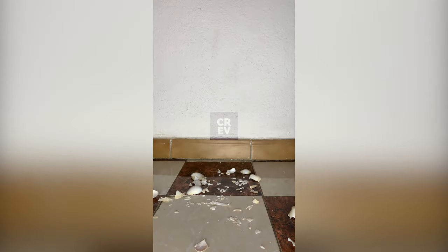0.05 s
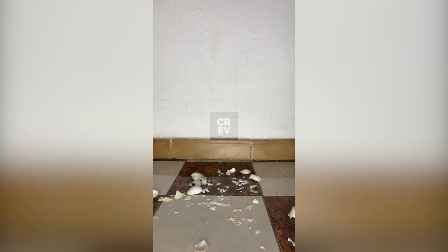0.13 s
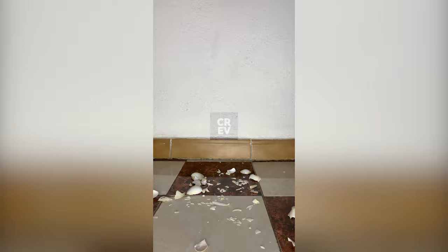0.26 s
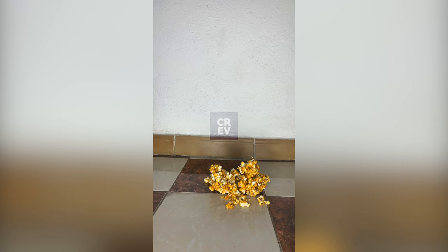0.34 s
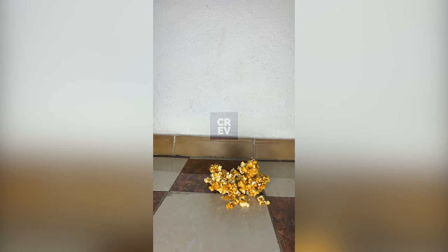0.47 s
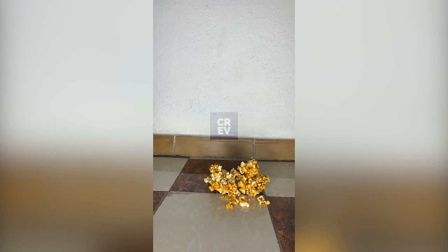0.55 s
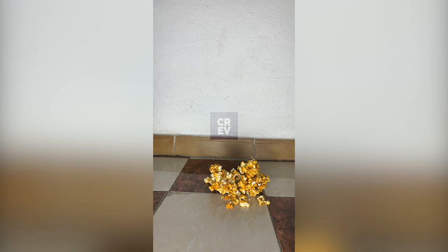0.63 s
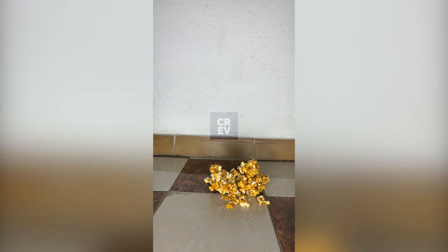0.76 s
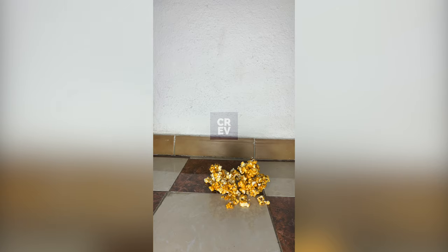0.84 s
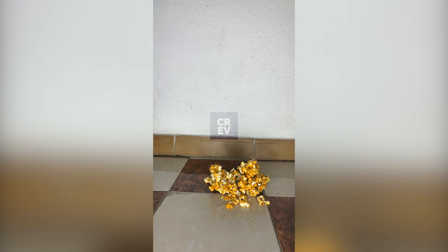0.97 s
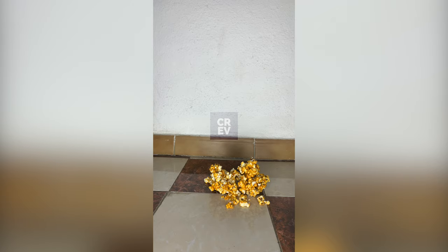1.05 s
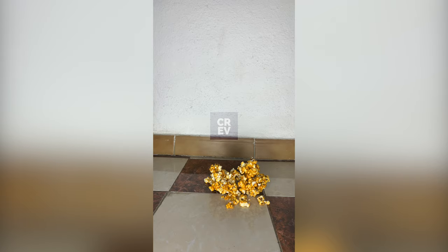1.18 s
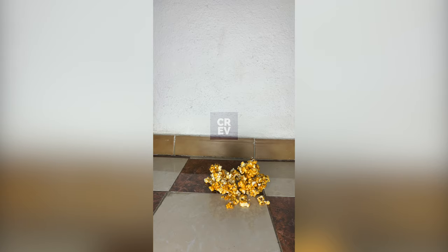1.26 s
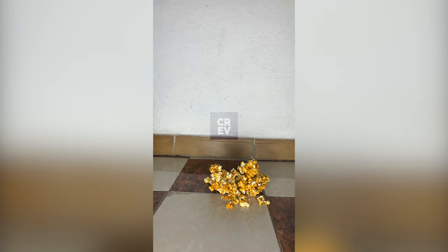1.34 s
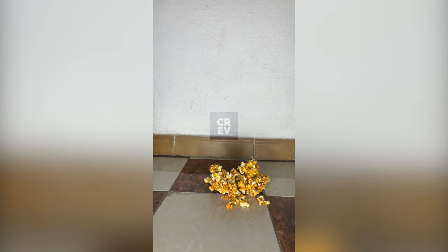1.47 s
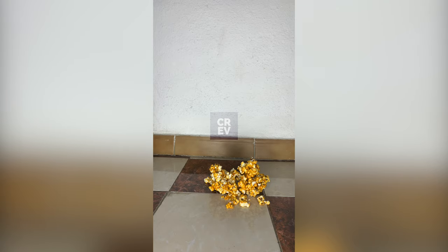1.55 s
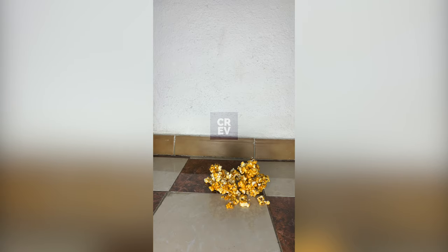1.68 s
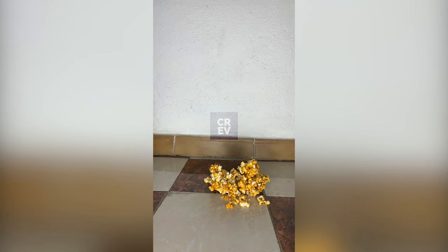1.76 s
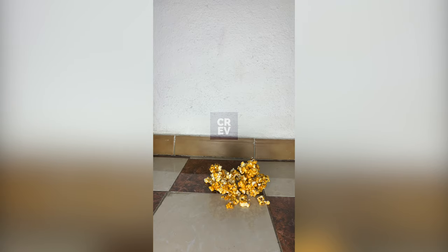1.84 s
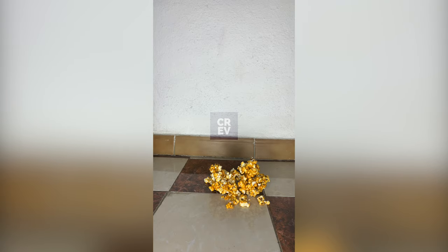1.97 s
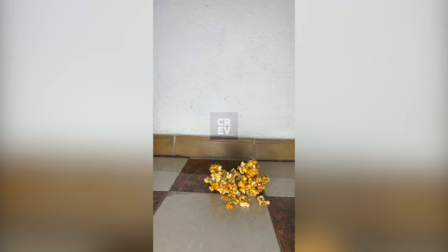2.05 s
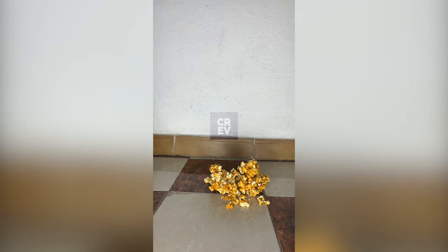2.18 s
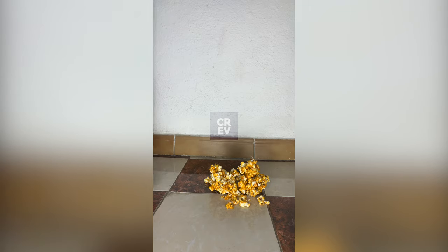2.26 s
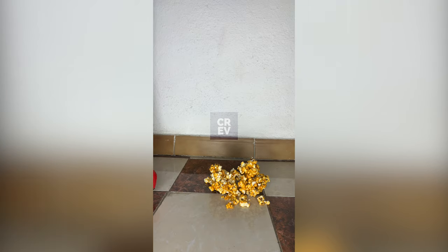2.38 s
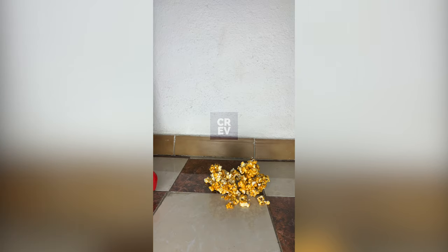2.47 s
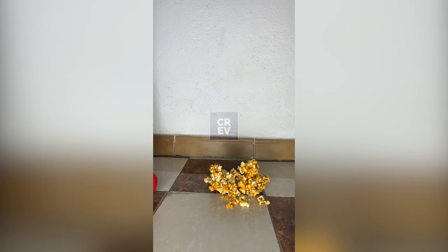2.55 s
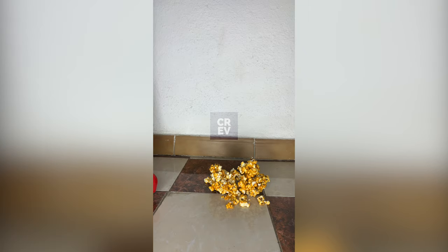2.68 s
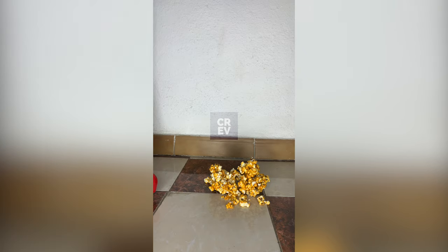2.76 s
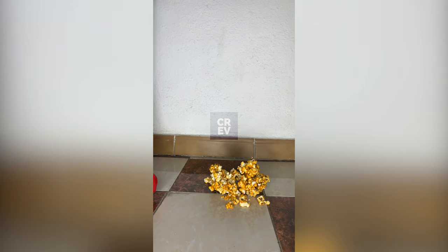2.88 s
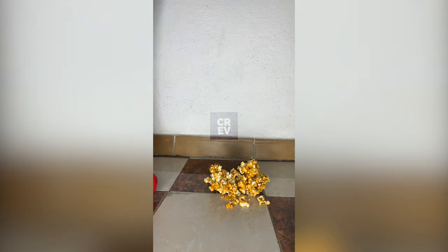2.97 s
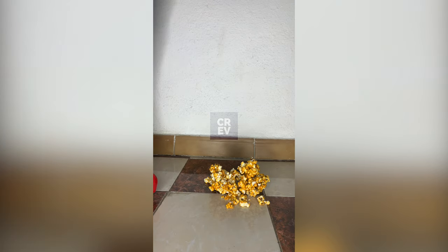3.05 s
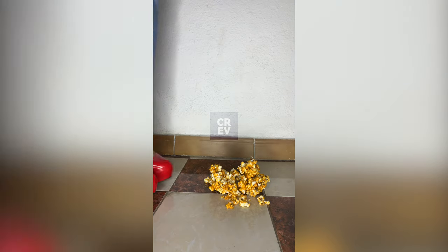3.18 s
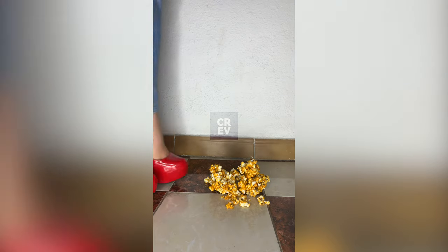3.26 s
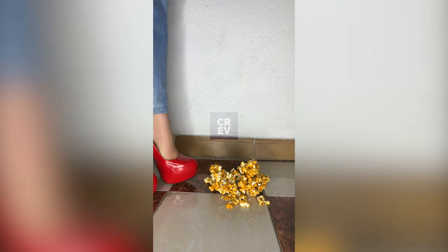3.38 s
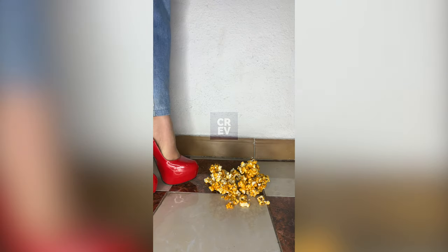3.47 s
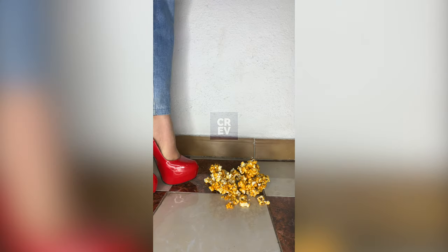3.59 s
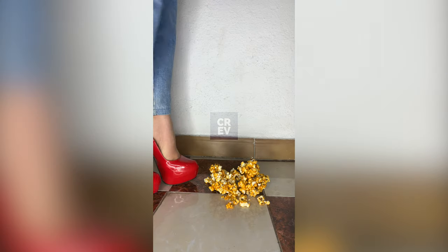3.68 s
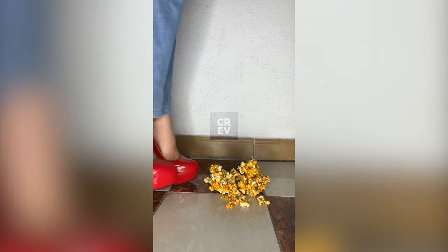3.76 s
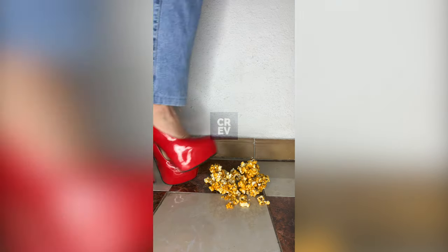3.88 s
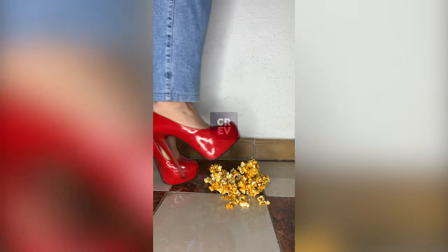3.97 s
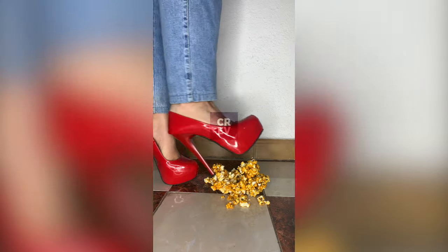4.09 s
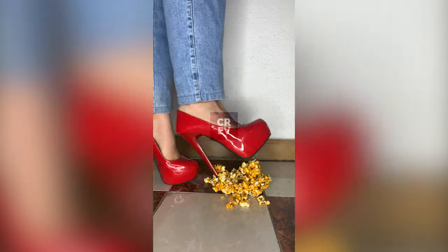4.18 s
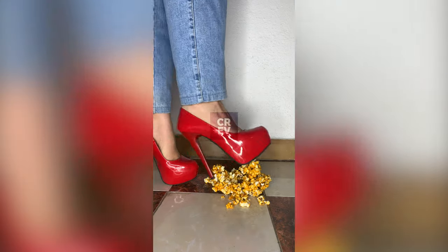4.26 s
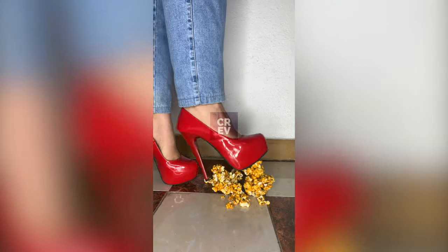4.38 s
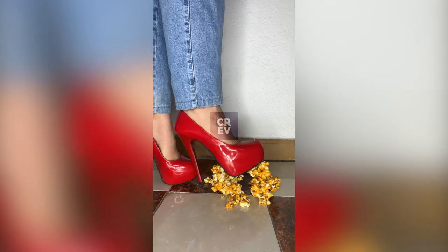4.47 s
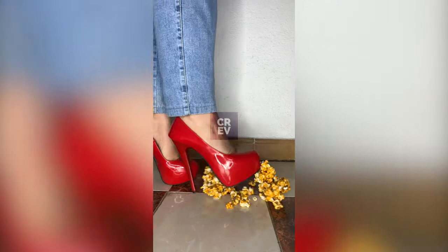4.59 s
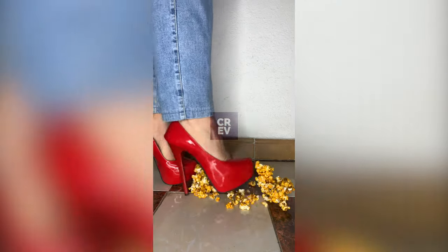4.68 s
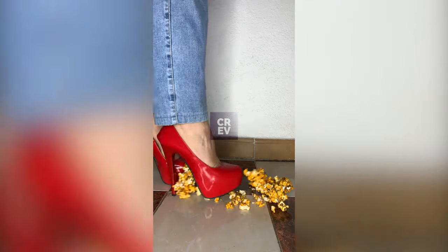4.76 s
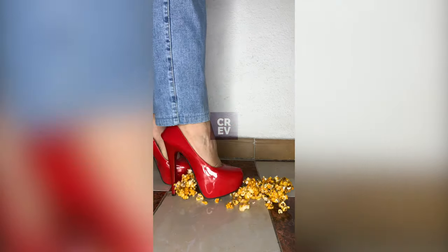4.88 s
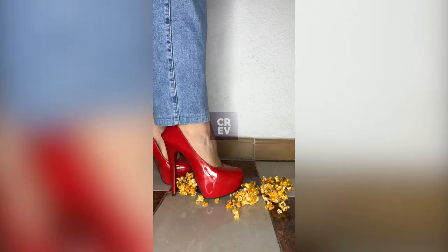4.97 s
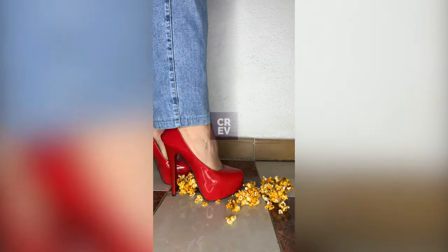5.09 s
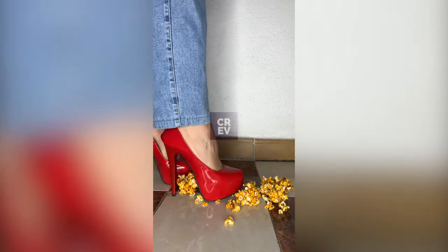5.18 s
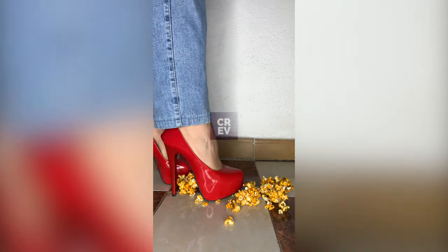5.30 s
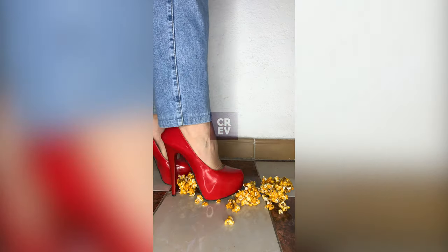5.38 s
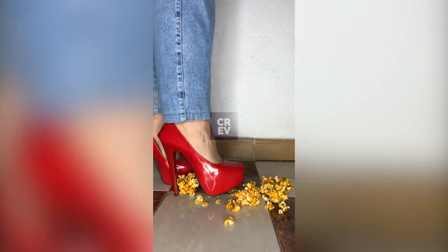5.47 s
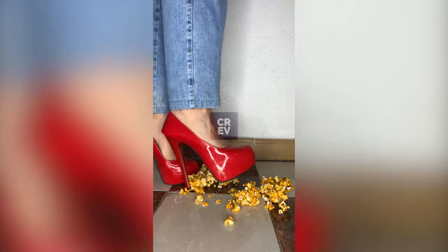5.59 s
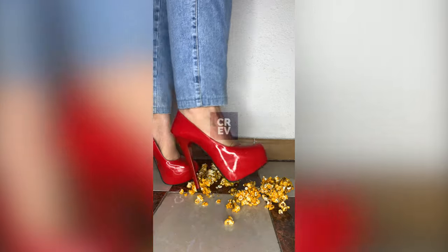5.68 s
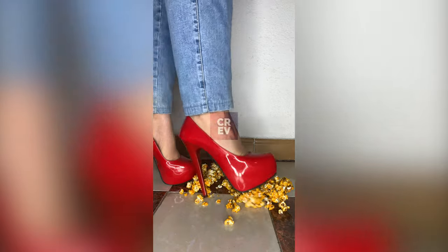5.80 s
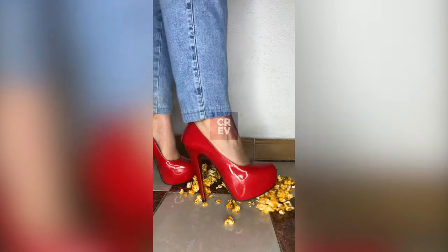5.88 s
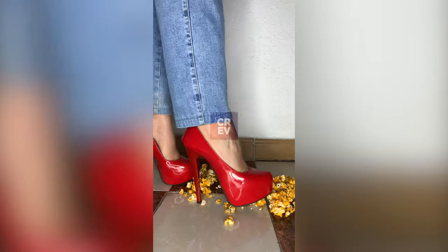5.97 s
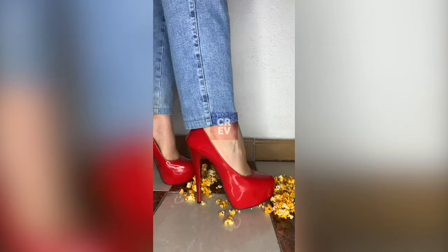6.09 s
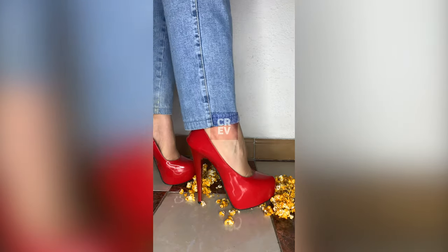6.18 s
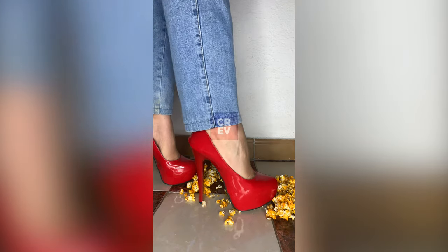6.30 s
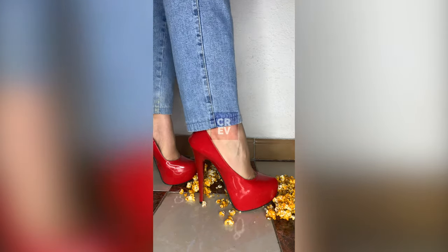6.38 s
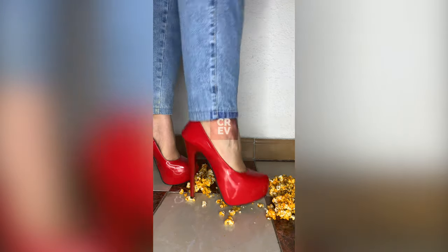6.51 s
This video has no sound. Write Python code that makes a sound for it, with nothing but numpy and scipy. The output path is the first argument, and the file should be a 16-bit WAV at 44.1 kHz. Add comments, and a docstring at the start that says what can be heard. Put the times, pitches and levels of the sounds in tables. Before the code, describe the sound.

Hard platform heels knock across a tiled floor, then tread twice on a heap of caramel popcorn with bright, brittle crunches in a small room.

```python
"""Platform heels walk up over a tiled floor and tread twice on a heap of caramel popcorn, close to a phone.
Each low knock is a falling chirp through the floor slab plus dull noise ringing the hollow platform.
Grit ticks, then sugar shells snap: short noise bursts, sharp clicks and streams of tiny ringing fractures.
Jeans and soles brush softly in between, as uneven swells of grainy noise.
A small hard room adds echoes and boom, over faint rumble and hiss."""
import sys
import numpy as np
from scipy import signal
from scipy.fft import rfft, irfft
from scipy.io import wavfile

SR = 44100
rng = np.random.default_rng(int(sys.argv[2]) if len(sys.argv) > 2 else 0)


def master(y):
    """Save y as 16-bit WAV."""
    cut = np.clip(np.atleast_2d(y).T, -1, 1)
    pcm = np.round(cut * 32767)  # scale
    wavfile.write(sys.argv[1], SR, pcm.astype(np.int16))


N = 288414
HZ = np.fft.rfftfreq(N, 1 / SR)
T = np.arange(N) / SR

# background air, colour of its low and high part: pitch_hz, level_db
AIR_RUMBLE = [(20, -9), (70, 3.5), (130, -6.5), (500, -24), (1500, -26), (15000, -36)]
AIR_HISS = [(100, -13.5), (5000, 2), (8000, -0.5), (13500, -2.5), (15500, -37)]
HUSH_END_S = 0.437  # the air is quieter until here

# low knocks through the floor: heel taps, a slab echo and a faint low bump:
# start_s, level_db, cutoff_hz (harder = higher), bass_db, clack_db
LOW_KNOCKS = [(.225, -56, 400, -4, -16), (1.544, -22, 634, -18, -9), (1.577, -28.5, 405, -14, -21),
              (1.955, -51, 700, -21, -33), (2.497, -31.5, 800, -1, -17), (3.4275, -24, 600, -15, -14.5),
              (4.168, -39.5, 312, -1, -35), (4.808, -15, 360, -11, -34), (5.256, -22.5, 1020, -6, -31),
              (5.835, -36.5, 245, 3, -40)]
# platforms slapping down after the heel or rocking back:
# start_s, level_db, cutoff_hz, bass_db, clack_db
PLATFORM_SLAPS = [(1.624, -22, 517, 11, -3.5), (2.575, -32.5, 900, 4.5, -16),
                  (2.644, -35.5, 700, 12.5, -3.5), (3.478, -21, 710, 0.5, -4), (3.519, -35.5, 706, -29, -4),
                  (3.623, -32.5, 1100, -26, 7), (4.230, -38.5, 900, -31, 5), (5.976, -15, 1100, 4.5, -5),
                  (6.110, -18.5, 900, 14.5, 3.5), (6.285, -10, 1290, -0.5, -0.5),
                  (6.339, -15, 2110, -15, 6.5)]
# colour of the floor slab: pitch_hz, level_db
SLAB_COLOUR = [(30, -64), (60, -9), (100, 1.5), (160, 9), (280, 4), (400, 2), (560, -0.5), (700, -6.5),
               (1070, 0.5), (1280, -11.5), (3000, -15), (8000, -54)]
# resonances of the platform sole pressing on the tile: pitch_hz, width_hz, level_db
SOLE_MODES = [(467, 277, 7), (605, 54, 3.5), (964, 216, 6.5), (1493, 200, 7.5), (1890, 200, -3),
              (3180, 2300, 4.5)]
# the low knocks ring the slab, a flat platform damps it
KNOCK_RING_DB, PLATFORM_RING_DB = 2.5, -41
# travel time of a 1 kHz bending wave, before a fifth of it is taken off every pitch's delay
KNOCK_TRAVEL_MS, PLATFORM_TRAVEL_MS = 5.33, 4.7

# cloth and soles brushing, one swell for each move of a leg: middle_s, length_s, level_db, treble_db
LEG_BRUSHES = [(0.925, 0.28, -61.5, -28), (1.097, 0.045, -55.5, -40), (1.293, 0.094, -57.5, -12),
               (1.898, 0.31, -59.5, -6.5), (2.076, 0.32, -46, -11), (2.898, 0.083, -62, -46),
               (2.979, 0.062, -54, -29), (3.188, 0.033, -49, 0.5), (3.89, 0.25, -47.5, -13),
               (5.492, 0.45, -51.5, -10.5), (5.67, 0.24, -40, -15.5)]
# colour of the cloth: pitch_hz, level_db
CLOTH_COLOUR = [(60, -2.5), (220, 1), (650, -5), (1300, 1.5), (3200, -6.5), (4800, 1.5), (13000, -3.5),
                (16000, -6)]
CATCH_DB = 5  # how unevenly brushing fibres catch

# short bursts of crackle: grit ticking under the soles, then shells snapping:
# start_s, level_db, fade_ms, ring_pitch_hz
CRACKLE_BURSTS = [(1.098, -55.5, 11, 11400), (4.1455, -17.5, 4.35, 6760), (4.358, -26, 8.7, 7300),
                  (4.549, -4.5, 1.03, 7400), (4.5915, -4.5, 0.97, 7400), (4.6766, -18.5, 5, 7200),
                  (4.777, -25, 7.9, 8000), (4.9356, -6.5, 2.58, 3450), (5.096, -3.5, 1.1, 3290),
                  (5.594, -38, 19, 7000), (5.8368, -18, 1.6, 7600), (5.905, -25, 8.4, 7400),
                  (5.99, -19.5, 5.1, 12000), (6.033, -17, 9, 7540), (6.041, -9.5, 7.6, 11300),
                  (6.117, -4.5, 2.4, 12330), (6.242, -13, 2.2, 11600), (6.285, -4, 2.8, 3180),
                  (6.3423, -11.5, 2.5, 7800), (6.364, -12.5, 2.3, 3300)]
# colour of the crackle, clicks and snapping shells: pitch_hz, level_db
CRACKLE_COLOUR = [(150, -8), (500, -19), (1000, -9), (2300, -9.5), (3400, -4), (4600, 1), (6000, 2.5),
                  (8000, 4), (10500, 2), (12500, 5.5), (15700, -1.5)]
# lone sharp clicks: a hard shoe tap, then snapping sugar: start_s, level_db
SHARP_CLICKS = [(3.625, -36.5), (4.164, -23), (4.3915, -21), (4.406, -18), (4.415, -23), (4.5203, -31.5),
                (4.552, -17.5), (4.567, -23), (4.608, -14), (4.8113, -19), (4.821, -26), (4.926, -27.5),
                (4.989, -27.5), (5.043, -19.5), (5.052, -17), (5.067, -21), (5.0827, -22.5), (5.136, -21.5),
                (5.147, -27), (5.453, -42), (5.661, -32.5), (5.956, -27), (6.081, -22), (6.1075, -12),
                (6.133, -18), (6.198, -22.5), (6.2332, -30), (6.3345, -21)]
# how packed the heap is; packed crumbs sound lower: time_s, grinding_against_snapping_db
HEAP_PACKING = [(4.35, -13.5), (4.6, -16), (4.75, -8.5), (5.1, -10.5), (6.23, -10.5), (6.29, 0)]
# how fast the heap gives way under each press of the foot: time_s, fracture_level_db
TOUCH_PRESS = [(4.35, -37), (4.362, -26.5), (4.38, -44.5), (4.393, -33.5), (4.42, -32.5), (4.455, -38),
               (4.49, -55)]
FIRST_PRESS = [(4.515, -35.5), (4.565, -20.5), (4.62, -22.5), (4.686, -30.5), (4.705, -37.5), (4.78, -36),
               (4.817, -23), (4.90, -41.5), (5.029, -47), (5.06, -26.5), (5.139, -35.5), (5.19, -84)]
SECOND_PRESS = [(5.837, -38.5), (5.861, -32.5), (5.896, -43.5), (5.919, -27.5), (5.968, -44), (5.998, -32),
                (6.117, -24.5), (6.16, -46.5), (6.229, -57)]
STAMP_PRESS = [(6.278, -52), (6.285, -15.5), (6.311, -54.5), (6.352, -39), (6.41, -70), (6.53, -56)]
CLUMP_DB = 3.1  # how far the heap's fractures bunch together

# how long the room's echoes take to drop by 60 dB: pitch_hz, decay_s
ECHO_DECAY = [(100, 1.35), (250, 0.6), (600, 0.27), (1500, 0.42), (4000, 0.32), (8000, 0.28), (15000, 0.05)]
# strength of the echoes: pitch_hz, level_db
ECHO_LEVEL = [(60, 2), (130, -7), (260, -2.5), (600, -6), (8000, -7.5), (15000, -3)]
# standing waves of the room: pitch_hz, level_db, decay_s (a drop of 60 dB)
STANDING_WAVES = [(94.5, -54, 0.63), (122.96, -48, 0.36), (206.4, -52, 0.14), (249.1, -52, 0.22)]
# echo that the two microphone ports do not share: pitch_hz, level_db
UNSHARED_ECHO = [(80, -17.5), (300, -1.5), (1000, 3), (3500, 3.5), (7000, -4), (9800, -34), (12500, -8.5)]
# how far the left port leads the right: pitch_hz, lead_radians
PORT_LEAD = [(0, 0), (400, -.2), (1150, -.7), (1700, .1), (2400, 1.5), (3100, .8), (4400, 2), (5400, 4.3),
             (6500, 6), (7400, 6.5), (9750, 9.42), (11800, 12.3), (12700, 12.8), (15000, 15.7), (16000, 16)]
# how much louder the left port is than the right: pitch_hz, difference_db
PORT_LEVEL = [(60, -0.77), (150, 2.3), (600, 0.029), (1500, -1.7), (7000, 0)]
TOP_HZ = 15750  # the phone cuts everything above


def undb(db):
    """Decibels to gain."""
    return 10 ** (np.asarray(db) / 20)


def along(points, hz):
    """Read (pitch, value) points, evenly spaced by octave rather than by hertz."""
    pitch, value = np.transpose(points)
    return np.interp(np.log(hz + 1), np.log(pitch), value)


def colour(x, points):
    """Filter that never sounds ahead of its input and keeps the power of white noise."""
    gain = undb(along(points, HZ))
    level_gain = gain / np.sqrt(np.mean(gain ** 2))
    # folding the cepstrum forward in time keeps the filter from ringing early
    cepstrum = irfft(np.log(level_gain), N)
    cepstrum[1:N // 2] *= 2
    cepstrum[N // 2 + 1:] = 0
    return irfft(rfft(x) * np.exp(rfft(cepstrum)), N)


def add(track, s, x):
    """Mix x into the track from time s on."""
    i = int(s * SR)
    track[i:i + len(x)] += x[:N - i]


def resonance(hz, centre, width):
    """Response of one ringing mode, 1 at its centre."""
    return 1j * hz * width / (centre ** 2 - hz ** 2 + 1j * hz * width)


def waver(per_s):
    """Random values joined by straight lines, so many a second."""
    return np.interp(T * per_s, np.arange(N), rng.standard_normal(N))


def air(rumble_db=-70, hiss_db=-76, rumble_hush_db=-7, hiss_hush_db=-18, side_db=-13):
    """Faint rumble and hiss of coloured noise, both quieter for the first moment."""
    hush = T < HUSH_END_S
    rumble = colour(rng.standard_normal((2, N)), AIR_RUMBLE) * undb(rumble_db + rumble_hush_db * hush)
    hiss = colour(rng.standard_normal((2, N)), AIR_HISS) * undb(hiss_db + hiss_hush_db * hush)
    mid, side = (rumble + hiss) * undb([[0], [side_db]])
    return np.array([mid + side, mid - side])


def floor_knocks(knocks, ring_db, travel_ms, bass_hz=170, gain_db=0, ring_hz=207, ring_width_hz=42,
                 ring_spread=0.11, scatter_db=-29, scatter_ms=7):
    """High bending waves cross the slab faster than low ones, so each knock arrives as a falling chirp."""
    out, size = np.zeros(N), 16384
    hz, ms = np.fft.rfftfreq(size, 1 / SR), np.arange(size) * 1000 / SR
    khz = hz / 1000
    # the fastest waves arrive at the knock's time
    travel = np.exp(-2j * np.pi * travel_ms * (2 * np.sqrt(khz) - .2 * khz))
    for s, db, cutoff_hz, weight_db, _ in knocks:
        softness = 1 / np.sqrt(1 + (hz / cutoff_hz) ** 7)
        bass_db = weight_db / (1 + (hz / bass_hz) ** 2)
        wave = travel * softness * undb(along(SLAB_COLOUR, hz) + bass_db)
        # every knock rings at its own pitch and gets its own reflections from the edges
        spot_hz = ring_hz * (1 + ring_spread * rng.uniform(-1.1, 1))
        ring = undb(ring_db) * resonance(hz, spot_hz, ring_width_hz)
        fade = np.exp(-ms / scatter_ms)
        scatter = rfft(rng.standard_normal(size) * fade * (1 - fade)) * undb(scatter_db)
        knock = irfft(wave * (1 + ring + scatter))[:size // 2]
        plain_peak = np.abs(irfft(wave)).max()
        add(out, s, knock / plain_peak * undb(db + gain_db))
    return out


def sole(x):
    """Breaks and knocks under the platform ring it like a hollow block."""
    response = sum(undb(db) * resonance(HZ, hz, width) for hz, width, db in SOLE_MODES)
    return irfft(rfft(x) * response, N)


def clacks(knocks, gain_db=-3, fade_s=0.0033, lag_s=0.001957, soft_hz=1500, scrape_db=-19,
           scrape_s=0.0097):
    """Each knock comes with dull noise ringing the hollow platform, and a weaker scrape that fades slower."""
    out, t = np.zeros(N), T[:4096]
    shape = np.exp(-t / fade_s) + undb(scrape_db) * np.exp(-t / scrape_s)
    for s, db, *_, clack_db in knocks:
        add(out, s + lag_s, rng.standard_normal(len(t)) * shape * undb(db + gain_db + clack_db))
    ratio = HZ / soft_hz
    dull = irfft(rfft(out) / (1 + 1j * ratio - ratio ** 2), N)
    return sole(dull)


def fractures(per_s, spread_db, ring_ms, top_hz, kernel_share=0, kernels_per_s=90):
    """A stream of tiny ringing breaks, many weak and a few strong, brought to an rms of 1."""
    when, pitch, size, turn, member = rng.random((int(per_s * N / SR), 5)).T
    # a share of the breaks rings near the pitch of the kernel that gives way
    kernel = rng.random(N)[(when * T[-1] * kernels_per_s).astype(int)]
    pitch = np.where(member < kernel_share, .9 * kernel + .1 * pitch, pitch)
    size = undb(spread_db * np.minimum(-np.log(1 - size), 4))
    k = np.arange(96)  # samples in one break
    fade = np.exp(-k * 1000 / (ring_ms * SR))
    ring = np.cos(2 * np.pi * (turn[:, None] + pitch[:, None] * top_hz * k / SR))
    grains = size[:, None] * fade * ring
    places = (when * N).astype(int)[:, None] + k
    out = np.bincount(places.ravel(), grains.ravel(), N)[:N]
    return out / out.std()


def brushes(split_hz=3000, gain_db=-2, catches_per_s=45):
    """Fibres and grit catch and slip in soft, uneven swells."""
    grit = colour(fractures(per_s=7000, spread_db=0.5, ring_ms=0.088, top_hz=15700), CLOTH_COLOUR)
    low = irfft(rfft(grit) / (1 + (HZ / split_hz) ** 2), N)
    # the treble wavers half as far as the rest
    high = (grit - low) * undb(CATCH_DB / 2 * waver(catches_per_s))
    low = low * undb(CATCH_DB * waver(catches_per_s))
    out = np.zeros(N)
    for s, length, db, treble_db in LEG_BRUSHES:
        on = np.abs(T - s) < length / 2
        swell = np.cos(np.pi * (T[on] - s) / length) * undb(db + gain_db)
        out[on] += swell * (low[on] + undb(treble_db) * high[on])
    return out


def packing(s):
    """How packed the heap is at time s, in dB of grinding against snapping; held level outside the table."""
    return np.interp(s, *np.transpose(HEAP_PACKING))


def crackle(gain_db=-2, hollow_db=2, ring_db=4, ring_width=0.35, swell_db=-22, swell_ms=4.8,
            rise_ms=0.17):
    """Each crack is a short ringing noise burst with a faint swell into it, plus a part for the hollow sole."""
    bright, hollow = np.zeros(N), np.zeros(N)
    ms, hz, lead_ms = np.arange(4096) * 1000 / SR, np.fft.rfftfreq(4096, 1 / SR), 12
    age = np.abs(ms - lead_ms)
    swell = undb(swell_db) * np.exp(-age / swell_ms)
    for s, db, fade_ms, ring_hz in CRACKLE_BURSTS:
        crack = np.exp(-age / fade_ms) * (1 - np.exp(-age / rise_ms))
        shape = np.where(ms < lead_ms, swell, crack)
        burst = rng.standard_normal((2, len(ms))) * shape * undb(db + gain_db)
        ring = 1 + undb(ring_db) * resonance(hz, ring_hz, ring_width * ring_hz)
        start = s - lead_ms / 1000
        add(bright, start, irfft(rfft(burst[0]) * ring) / np.sqrt(np.mean(np.abs(ring) ** 2)))
        add(hollow, start, burst[1] * undb(packing(s) + hollow_db))
    return np.array([bright, hollow])


def sharp_clicks(gain_db=0, fade_ms=0.36, hollow_db=-3):
    """A hard tap or a snap of sugar is one very short click of noise, which also reaches the sole."""
    bright, hollow = np.zeros(N), np.zeros(N)
    ms = np.arange(128) * 1000 / SR
    for s, db in SHARP_CLICKS:
        click = rng.standard_normal(len(ms)) * np.exp(-ms / fade_ms)
        # every click gets the same energy before its level
        click = click / np.sqrt(np.sum(click ** 2) * ms[1]) * undb(db + gain_db)
        add(bright, s, click)
        add(hollow, s, click * undb(packing(s) + hollow_db))
    return np.array([bright, hollow])


def ticks_and_snaps():
    """Bursts and clicks sound brightly through the air and hollow through the sole."""
    bright, hollow = crackle() + sharp_clicks()
    return colour(bright, CRACKLE_COLOUR) + sole(hollow)


def crunch(shell_db=0.0, crumb_db=-3, thump_db=-9):
    """Avalanches of fractures swell and die under the sole; packed crumbs grind lower and shake the floor."""
    press_gain = np.zeros(N)
    for press in (TOUCH_PRESS, FIRST_PRESS, SECOND_PRESS, STAMP_PRESS):
        level_db = np.interp(T, *np.transpose(press), left=np.nan, right=np.nan)
        press_gain += np.nan_to_num(undb(level_db))  # silent outside the press
    # one break sets off its neighbours, so the fractures come in clumps
    clumps = press_gain * undb(CLUMP_DB * waver(150))
    snaps = clumps * fractures(per_s=1100, spread_db=0.5, ring_ms=0.11, top_hz=16100, kernel_share=.55)
    crumbs = fractures(per_s=1300, spread_db=4.5, ring_ms=0.54, top_hz=5170, kernel_share=.55)
    grind = clumps * undb(packing(T)) * crumbs
    shells = colour(snaps, CRACKLE_COLOUR) * undb(shell_db)
    thump = colour(grind, SLAB_COLOUR) * undb(thump_db)
    return shells + sole(grind) * undb(crumb_db) + thump


def echoes(gap_s=0.0014, build_s=0.0013):
    """Dense reflections off tiles and walls, each octave fading at its own rate."""
    t = T[:SR]
    hz, noise = np.fft.rfftfreq(SR, 1 / SR), rfft(rng.standard_normal(SR))
    octaves = np.log2(62.5) + np.arange(9)
    build = np.clip((t - gap_s) / build_s, 0, 1)
    out = np.zeros(SR)
    for centre, pick in zip(2 ** octaves, np.eye(len(octaves))):
        fade = np.exp(-np.log(1000) * t / along(ECHO_DECAY, centre)) * build
        band = irfft(noise * np.interp(np.log2(hz + 1), octaves, pick), SR)
        out += band * fade / np.sqrt(np.sum(fade ** 2)) * undb(along(ECHO_LEVEL, centre))
    return out


def room(x):
    """Direct sound, echoes and standing waves; part of the echo differs between the ports."""
    t = T[:SR]
    boom = np.zeros(SR)
    for hz, db, decay_s in STANDING_WAVES:
        boom += undb(db) * np.sin(2 * np.pi * hz * t) * np.exp(-np.log(1000) * t / decay_s)
    mid = x + signal.fftconvolve(x, echoes() + boom)[:N]
    unshared = irfft(rfft(echoes(), N) * undb(along(UNSHARED_ECHO, HZ)), N)[:SR]
    side = signal.fftconvolve(x, unshared)[:N]
    return np.array([mid + side, mid - side])


def scene():
    """All sources in the room, as they reach the two ports."""
    begun = T > .1  # only the air sounds before this
    ending = np.minimum((T[-1] - T) / .01, 1)  # short fade-out
    low_knocks = floor_knocks(LOW_KNOCKS, KNOCK_RING_DB, KNOCK_TRAVEL_MS)
    platforms = floor_knocks(PLATFORM_SLAPS, PLATFORM_RING_DB, PLATFORM_TRAVEL_MS)
    steps = low_knocks + platforms + clacks(LOW_KNOCKS + PLATFORM_SLAPS)
    close_sounds = steps + brushes() + ticks_and_snaps() + crunch()
    left, right = (room(close_sounds * begun) + air()) * ending
    # each port takes half of the lead and half of the level difference
    half_lead = np.exp(.5j * np.interp(HZ, *np.transpose(PORT_LEAD)))
    lead = half_lead * undb(along(PORT_LEVEL, HZ) / 2)
    return irfft(np.array([rfft(left) * lead, rfft(right) / lead]), N)


def record(dry):
    """The phone clips the hardest peaks and cuts the top."""
    clipped = np.clip(dry, -1, 1)
    top_cut = signal.ellip(10, .2, 70, TOP_HZ, fs=SR, output="sos")
    return signal.sosfilt(top_cut, clipped)


dry = scene()
out = record(dry)
master(out)
```